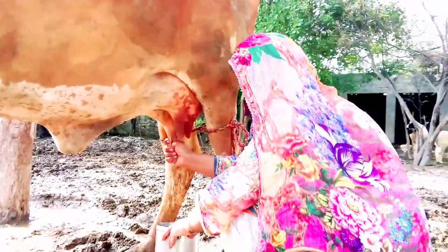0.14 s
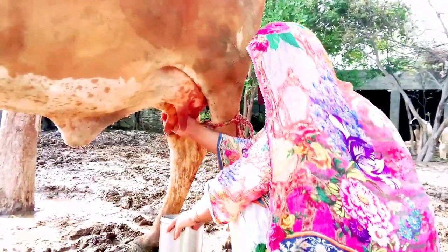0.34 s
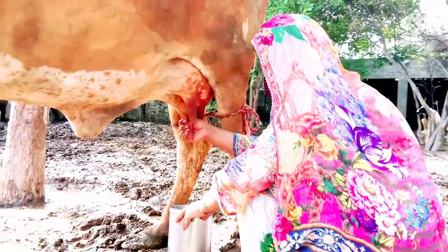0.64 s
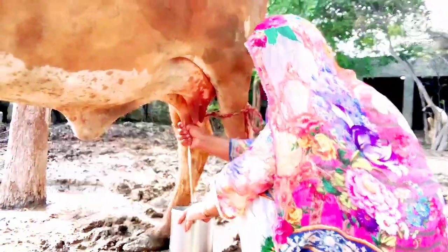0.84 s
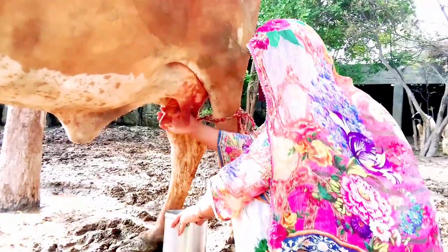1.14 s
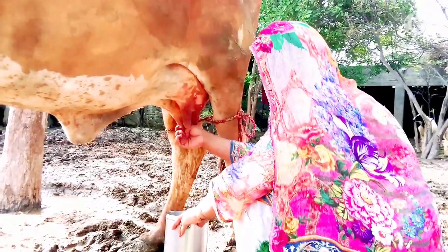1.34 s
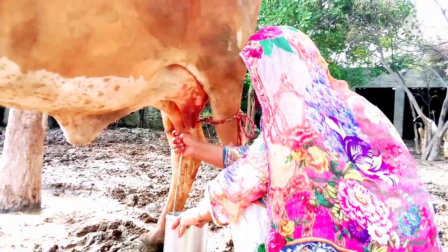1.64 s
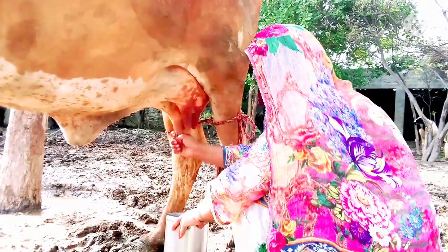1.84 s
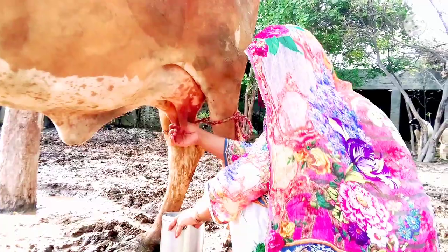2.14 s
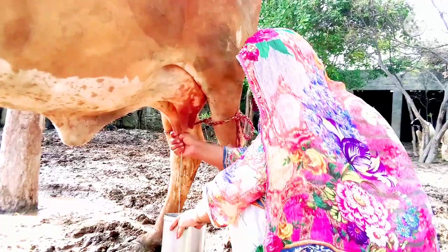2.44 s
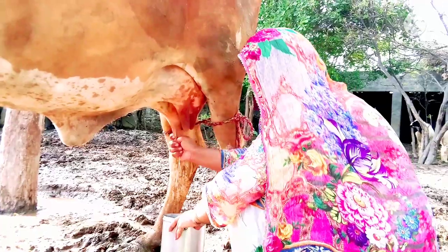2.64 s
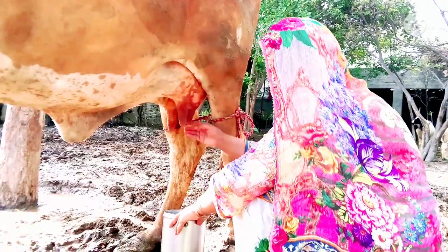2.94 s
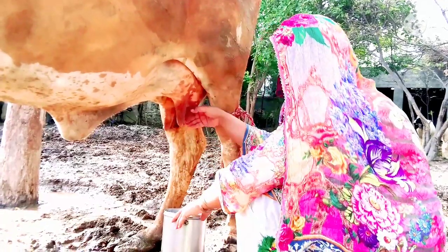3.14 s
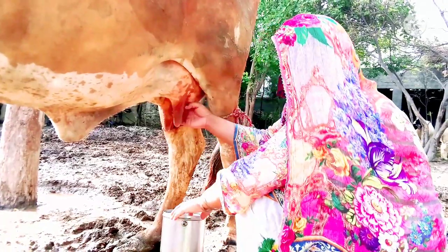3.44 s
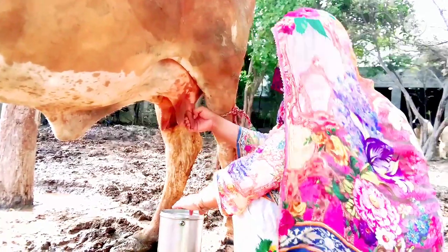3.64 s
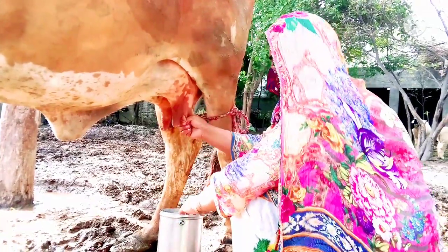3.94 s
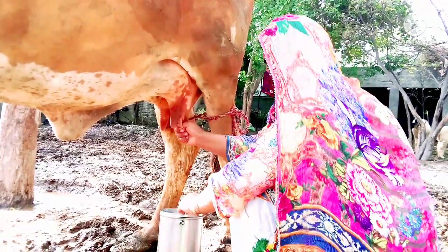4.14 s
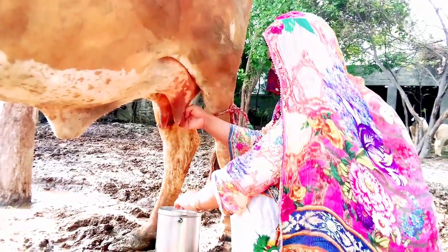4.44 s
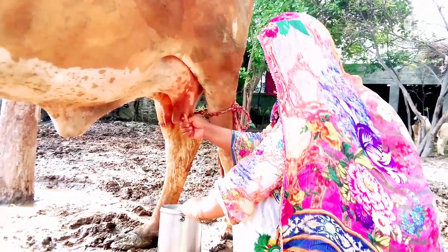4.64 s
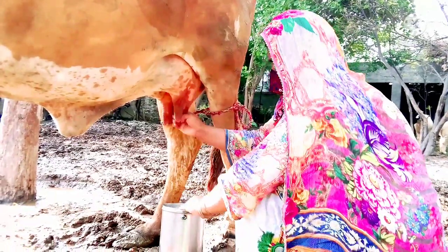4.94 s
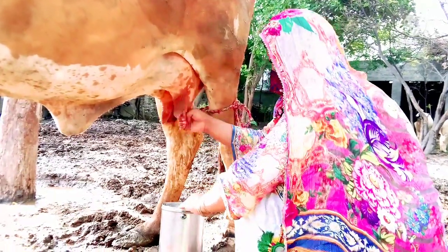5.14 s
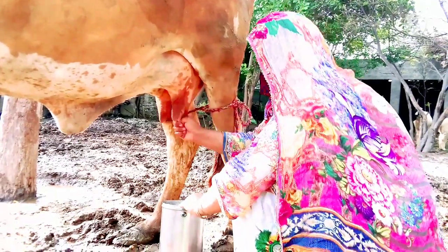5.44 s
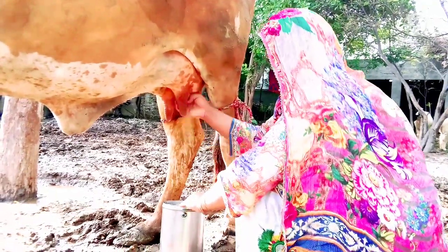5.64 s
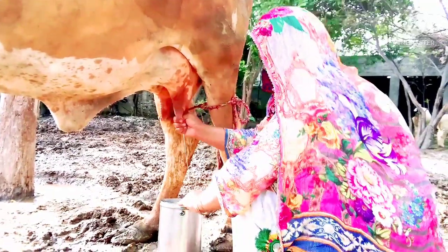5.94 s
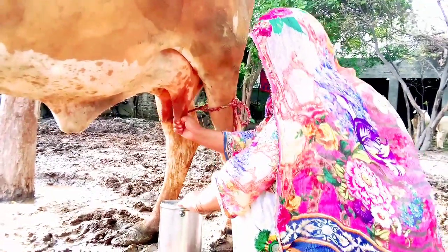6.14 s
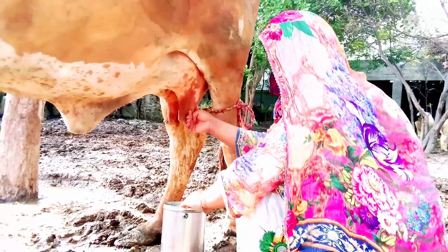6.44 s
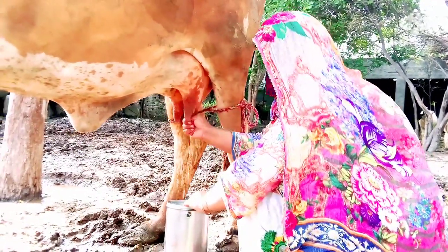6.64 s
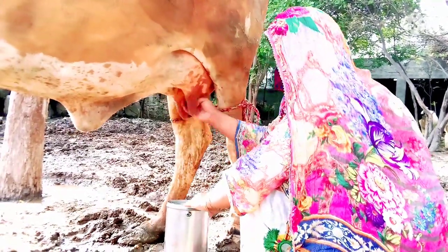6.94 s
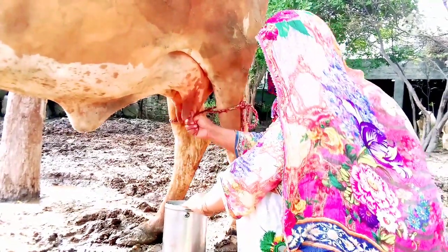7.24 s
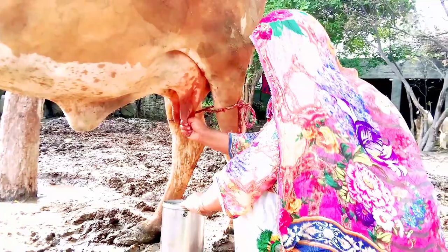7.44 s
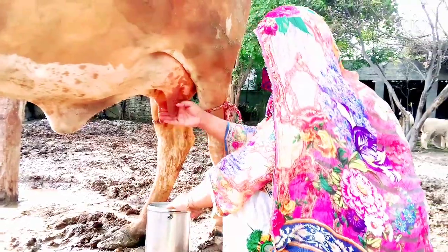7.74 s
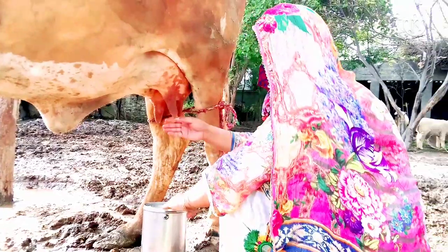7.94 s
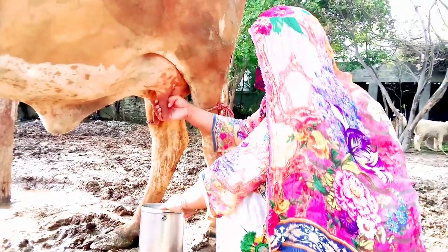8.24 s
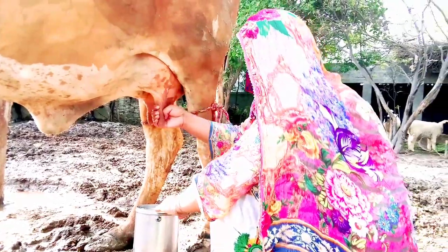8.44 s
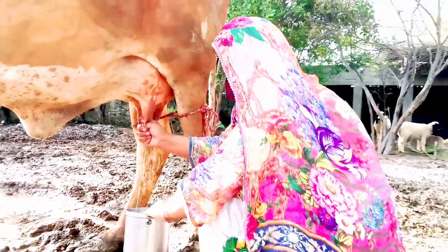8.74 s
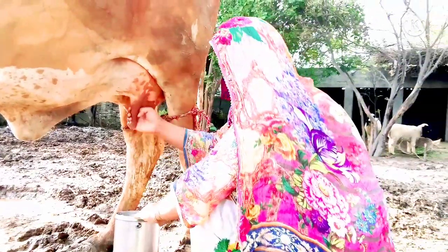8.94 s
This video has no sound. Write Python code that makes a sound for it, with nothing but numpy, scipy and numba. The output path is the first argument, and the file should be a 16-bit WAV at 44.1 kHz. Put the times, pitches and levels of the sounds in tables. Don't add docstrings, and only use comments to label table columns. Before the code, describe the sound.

Close by, four brief jets of milk plunge into froth in a metal pail, under a second apart, each a lumpy gurgling drum with a light metallic splash and fine spray. A bird whistles quick rising notes over the first two. Then the milking stops; soft knocks, straw snaps and cloth scuffs remain with far clucks, before another bird trills. Open farm yard, insect hiss, single phone microphone with slightly warbling noise reduction.

```python
import sys
import numpy as np
from scipy import signal
from scipy.io import wavfile
from scipy.ndimage import uniform_filter1d, map_coordinates
from numba import njit

SR = 44100
rng = np.random.default_rng(int(sys.argv[2]) if len(sys.argv) > 2 else 0)


def volts_from_decibels(level):
    exponent = np.asarray(level, float) / 20
    return 10 ** exponent


def generate_wav(sig):
    pcm = np.round(np.clip(np.atleast_2d(sig).T, -1, 1) * 32767).astype(np.int16)
    wavfile.write(sys.argv[1], SR, pcm)


N = 401310


def rms_one(x):
    return x / np.sqrt(np.mean(x ** 2) + 1e-20)


def levelled(x, window):
    return x / np.sqrt(uniform_filter1d(x ** 2, size=window) + 1e-12)


def in_time(rows):
    s, value = np.transpose(rows)
    return np.interp(np.arange(N) / SR, s, value)


def gate(s, length, rise, fall, sag_db_per_s=0):
    t = np.arange(N) / SR - s
    fade_db = -20 * np.maximum(t - length, 0) / fall
    return np.clip(t / rise, 0, 1) ** 2 * volts_from_decibels(fade_db - sag_db_per_s * np.clip(t, 0, length))


def lifts(rows, column):
    t = np.arange(N) / SR
    return sum(row[column] * np.cos(np.pi * np.clip((t - row[0]) / row[1], -.5, .5)) ** 2 for row in rows)


def add(out, s, sound):
    i = max(round(s * SR), 0)
    out[i:i + len(sound)] += sound[:N - i]


def drift(rate_hz):
    r = np.exp(-80 * np.pi * rate_hz / SR)
    slow = signal.lfilter([1], [1, -2 * r, r * r], rng.standard_normal(N // 40 + 2002))[2000:]
    return np.interp(np.arange(N) / 40, np.arange(len(slow)), rms_one(slow))


def grains(per_s, spread_db):
    sizes = volts_from_decibels(spread_db * np.minimum(rng.exponential(1, N), 4)) * rng.choice([-1, 1], N)
    return rms_one(sizes * (rng.random(N) < per_s / SR) + 1e-18)


def resonance(x, hz, width_hz):
    r = np.exp(-np.pi * width_hz / SR)
    return signal.lfilter([(1 - r * r) / 2, 0, (r * r - 1) / 2], [1, -2 * r * np.cos(2 * np.pi * hz / SR), r * r], x)


@njit
def gliding(x, hz, width_hz, sr):
    out, r = np.zeros(len(x)), np.exp(-np.pi * width_hz / sr)
    for i in range(2, len(x)):
        out[i] = x[i] - x[i - 2] + 2 * r * np.cos(2 * np.pi * hz[i] / sr) * out[i - 1] - r * r * out[i - 2]
    return out


def coloured(x, spectrum, patchy_db, patch_s=.06):
    hz, s, cells = signal.stft(x, SR, nperseg=512)
    place, points = np.log(np.maximum(hz, 10)), np.array(spectrum)
    chance = rng.standard_normal((50, 400))
    rows, steps = np.meshgrid(6 * (place - np.log(10)), s / patch_s, indexing="ij")
    patches = map_coordinates(chance, [rows, steps], order=1, mode="wrap")
    level_db = np.interp(place, np.log(points[:, 0]), points[:, 1])[:, None] + patchy_db * patches
    return rms_one(signal.istft(cells * volts_from_decibels(level_db), SR, nperseg=512)[1][:N])


# start in seconds, level in dB of cavity, wall, spray.
SLUGS = [(0.048, -38, -46, -62), (0.048, -35.5, -41.5, -35.5), (0.064, -61, -53, -52),
         (0.077, -43, -48, -48), (0.083, -37, -50, -46), (0.111, -38.5, -48, -52), (0.124, -37.5, -53, -45),
         (0.135, -46, -51, -45), (0.156, -47, -44.5, -44), (0.169, -41, -54, -48), (0.191, -37.5, -52, -50),
         (0.208, -35.5, -46.5, -44), (0.227, -44, -47, -44.5), (0.244, -52, -53, -48),
         (0.879, -52, -49, -42), (0.896, -47, -38.5, -45), (0.914, -36, -44, -39), (0.925, -48, -41, -51),
         (0.94, -34.5, -55, -54), (0.964, -41, -45, -41.5), (0.986, -34.5, -47, -40),
         (1.009, -39, -45, -43), (1.026, -30, -43, -40), (1.048, -44, -43, -40), (1.06, -40, -44, -41.5),
         (1.647, -45.5, -47, -40), (1.661, -47, -48, -46), (1.677, -37, -46, -44), (1.694, -33.5, -46, -42),
         (1.707, -35, -54, -47), (1.728, -33.5, -43, -47), (1.74, -33.5, -41.5, -43),
         (1.767, -30.5, -46.5, -48), (1.783, -34, -57, -56), (1.801, -31.5, -56, -45),
         (1.814, -41, -51, -55), (1.833, -37, -56, -64), (2.558, -55, -44.5, -46), (2.569, -44, -43, -45),
         (2.577, -40, -46.5, -56), (2.599, -40, -44.5, -44), (2.616, -32, -55, -42),
         (2.626, -38.5, -51, -43), (2.643, -39, -51, -48), (2.652, -44, -44.5, -40),
         (2.67, -40.5, -44, -46), (2.689, -53, -55, -47)]


def slugged(stream, column, rise_s, fall_s, stream_db, slug_db):
    power = np.zeros(N)
    t = np.arange(3000) / SR
    swell = (1 - np.exp(-t / rise_s)) * np.exp(-t / fall_s)
    for row in SLUGS:
        add(power, row[0], (volts_from_decibels(row[column] + slug_db) * swell / swell.max()) ** 2)
    return np.sqrt(power + (volts_from_decibels(stream_db) * stream) ** 2)


# plunge start in seconds, length in seconds, plunge level in dB,
# wall and spray level in dB, froth cavity at first in Hz.
JETS = [
    (0.041, 0.19, -47.5, -56, 870),
    (0.894, 0.18, -46.5, -46, 667),
    (1.639, 0.16, -42, -48, 840),
    (2.569, 0.11, -47, -47.5, 695),
]


def froth_cavity(lumps_db):
    deep_hz, sinks_s = 465, 0.058
    t, hz = np.arange(N) / SR, np.zeros(N)
    stream = np.zeros(N)
    for s, length, db, _, first_hz in JETS:
        now = (t > s - .1) | (hz == 0)
        hz[now] = deep_hz + (first_hz - deep_hz) * np.exp(-np.maximum(t[now] - s, 0) / sinks_s)
        stream += volts_from_decibels(db) * gate(s - .02, length + 0.015, rise=0.046, fall=0.063)
    slugs = grains(450, 2.6) * volts_from_decibels(lumps_db)
    low = gliding(gliding(slugs, hz, 140.0, SR), hz, 250.0, SR)
    overtones = gliding(gliding(slugs, 1.34 * hz, 110.0, SR), 1.524 * hz, 110.0, SR)
    plunge = levelled(rms_one(low) + 0.22 * rms_one(overtones), 500)
    return slugged(stream, 1, rise_s=.003, fall_s=0.0082, stream_db=-4.5, slug_db=-5.5) * plunge


# centre in Hz, width in Hz, level in dB.
PAIL = [(1260, 310, 1), (2465, 410, 10), (3300, 410, 6.5)]


def pail_wall(lumps_db):
    lead_s = 0.023
    stream = sum(volts_from_decibels(db) * gate(s - lead_s, length + lead_s, rise=0.007, fall=0.058)
                 for s, length, _, db, _ in JETS)
    drops = grains(900, 4.0) * volts_from_decibels(.6 * lumps_db + 2.5 * drift(70))
    wall = np.zeros(N)
    for hz, width_hz, db in PAIL:
        ring = resonance(resonance(drops, hz, width_hz), hz, width_hz * 1.3)
        wall += volts_from_decibels(db) * rms_one(ring) * volts_from_decibels(4.2 * drift(23))
    stream = slugged(stream, 2, rise_s=0.0015, fall_s=0.0078, stream_db=-7, slug_db=-1.5)
    return stream * levelled(wall, 500)


# frequency in Hz, level in dB per Hz.
SPRAY = [(2940, -103), (5000, -12), (7100, -2.5), (10500, -10), (13700, -7.5), (15200, -5), (16000, -24)]


def spray(lumps_db):
    lead_s = .05
    stream = sum(volts_from_decibels(db) * gate(s - lead_s, length + lead_s, rise=.05, fall=.04, sag_db_per_s=21)
                 for s, length, _, db, _ in JETS)
    drops = grains(7000, 5.3) * volts_from_decibels(0.26 * lumps_db + 1.2 * drift(19))
    hiss = levelled(coloured(drops, SPRAY, patchy_db=4.0, patch_s=.015), 900)
    return slugged(volts_from_decibels(0.5) * stream, 3, rise_s=.002, fall_s=0.0087, stream_db=-3.5, slug_db=-1.5) * hiss


def jets():
    lumps_db = 1.5 * drift(40)
    return froth_cavity(lumps_db) + pail_wall(lumps_db) + spray(lumps_db)


def whistle(hz, db, edge, rough):
    shake = rng.standard_normal((2, 9000))
    shake = [rms_one(uniform_filter1d(uniform_filter1d(v, size=90), size=90))[:len(hz)] for v in shake]
    phase = 2 * np.pi * np.cumsum(hz * (1 + 0.017 * rough * shake[0])) / SR
    tone = np.sin(phase) * (1 + rough * shake[1])
    return np.sqrt(2) * volts_from_decibels(db) * signal.windows.tukey(len(hz), np.clip(edge, 0, 1)) * tone


# start in seconds, start in Hz, top in Hz, level in dB.
RISES = [(0.215, 3600, 4640, -50), (.347, 3450, 4575, -49.5), (0.489, 3300, 4510, -50),
         (0.62, 3350, 4610, -50), (.783, 3650, 4610, -51), (.945, 4600, 4634, -49),
         (1.073, 3550, 4610, -47.5), (1.221, 3800, 4705, -46)]


def rising_bird():
    out, t = np.zeros(N), np.arange(round(.064 * SR)) / SR
    for s, start_hz, top_hz, db in RISES:
        leap_hz = (start_hz - top_hz) * np.exp(-np.maximum(t - .004, 0) / 0.0062)
        creep_hz = -255 * np.exp(-t / 0.0188)
        loudness = 1 - .45 * np.exp(-(t / .016) ** 2)
        add(out, s, loudness * whistle(top_hz + leap_hz + creep_hz, db, edge=0.063, rough=0.21))
    return out


def sliding_notes(rows):
    out = np.zeros(N)
    for s, length, start_hz, end_hz, db in rows:
        along = np.linspace(0, 1, round(length * SR))
        track = start_hz + (end_hz - start_hz) * (1 - (1 - along) ** 1.9)
        add(out, s, whistle(track, db, edge=0.13, rough=0.48))
    return out


# start in
# seconds, length in seconds, start in Hz, end in Hz, level in dB.
NOTES = [(0.023, 0.081, 5200, 2680, -49.5), (7.35, 0.085, 4900, 4700, -61), (7.444, 0.051, 4640, 4220, -54),
         (7.515, .012, 5900, 5470, -60), (7.649, 0.049, 5570, 4600, -54.5), (7.66, .02, 4330, 3900, -59),
         (7.738, 0.076, 4530, 4300, -53.5), (7.949, 0.028, 4120, 3980, -62),
         (7.965, 0.052, 5740, 4500, -54), (8.07, 0.046, 4440, 4430, -50.5),
         (8.269, 0.033, 5150, 5040, -54.5), (8.30, 0.028, 4760, 4410, -48.5),
         (8.389, 0.047, 4560, 4310, -50.5), (8.727, 0.021, 3480, 3250, -58.5)]
# start in seconds, pitch in Hz, level in dB.
TRILLS = [
    (7.484, 3380, -42.5),
    (7.788, 3424, -41.5),
    (8.104, 3400, -41.5),
    (8.429, 3337, -41),
]


def singing_bird():
    out = sliding_notes(NOTES)
    t = np.arange(round(0.0518 * SR)) / SR
    turn = t * 88.6 % 1
    pulse = np.sin(np.pi * np.minimum(turn / 0.7, 1))
    for s, hz, db in TRILLS:
        out += sliding_notes([(s - .136, 0.0164, 3490, 3320, db - 10)])
        track = hz * (.93 + (0.1333 + 2.5 * t) * (1 - np.minimum(turn / 0.595, 1)))
        add(out, s, whistle(track, db, edge=0.18, rough=0.36) * pulse)
    return out


# start in seconds, length in seconds, start in Hz, end in Hz, level in dB.
CLUCKS = [(2.835, 0.013, 1660, 1770, -55), (3.155, 0.021, 1660, 1570, -58.5),
          (3.16, 0.018, 2190, 2203, -62.5), (3.71, 0.08, 2163, 2170, -68.5), (3.90, 0.028, 1674, 1760, -65),
          (4.85, 0.072, 1976, 2046, -64), (4.92, 0.027, 1670, 1636, -60.5),
          (4.934, 0.11, 1996, 1986, -65.5), (5.06, 0.041, 1947, 1906, -61.5),
          (5.082, 0.17, 1740, 1912, -69), (5.62, 0.0296, 1820, 1560, -61.5),
          (5.955, 0.099, 1630, 1610, -71), (6.373, 0.071, 2370, 2350, -65),
          (6.522, 0.038, 1690, 1580, -64.5), (6.54, 0.163, 2400, 2293, -70),
          (6.876, 0.071, 1266, 1340, -68), (8.00, 0.072, 1832, 1984, -59), (8.40, 0.013, 1790, 1810, -64),
          (8.47, 0.084, 1824, 1775, -69)]


def far_fowl():
    return sliding_notes(CLUCKS)


# delay in seconds, level in dB.
ECHOES = [(0.057, -7), (0.113, -18)]


def birds():
    riser, others = rising_bird(), singing_bird() + far_fowl()
    heard, scattered = riser + others, 0.88 * resonance(riser, 4600, 1100) + others
    wall = rng.standard_normal(3000) * volts_from_decibels(-60 * np.arange(3000) / SR / 0.066)
    smeared = signal.fftconvolve(riser, wall / np.linalg.norm(wall))[:N]
    for lag_s, db in ECHOES:
        add(heard, lag_s, volts_from_decibels(db) * (smeared + 0.65 * riser))
    t = np.arange(SR // 2) / SR
    trees = rng.standard_normal(len(t)) * volts_from_decibels(-60 * t / 0.36) * (t > .003)
    return heard + volts_from_decibels(1) * signal.fftconvolve(scattered, trees / np.linalg.norm(trees))[:N]


# start in seconds, peak in dB, ring in Hz, T60 in seconds.
KNOCKS = [(0.049, -26, 3250, 0.035), (0.898, -34, 3490, 0.023), (1.072, -32, 3420, 0.035),
          (1.638, -31, 3470, 0.017), (2.26, -36.5, 1155, 0.036), (2.345, -42.5, 1500, 0.04),
          (2.559, -42, 2260, .03), (2.643, -36, 2310, .02), (2.89, -44.5, 3280, 0.052),
          (3.294, -45.5, 1214, 0.14), (3.588, -54, 881, 0.12), (4.224, -49, 2000, 0.029),
          (4.378, -41, 973, 0.053), (4.799, -36, 1016, 0.064), (4.799, -29.5, 1210, 0.02),
          (4.829, -40.5, 1105, 0.022), (5.039, -40, 2700, 0.041), (5.423, -38.5, 3400, 0.025),
          (5.475, -32.5, 2620, 0.034), (5.613, -29.5, 4130, 0.016), (5.912, -43, 1700, 0.041),
          (5.912, -47, 3130, .02), (5.924, -45, 2760, 0.02), (5.928, -41, 1330, 0.023),
          (7.034, -43.5, 794, 0.058), (8.848, -45.5, 1280, 0.047), (8.866, -39, 780, 0.024),
          (8.93, -43, 1240, 0.32)]


def knocks():
    out, t = np.zeros(N), np.arange(8000) / SR
    for s, db, hz, t60_s in KNOCKS:
        rough = rms_one(resonance(rng.standard_normal(len(t)), hz, .5 * hz))
        fade = volts_from_decibels(-60 * t / t60_s) * np.minimum(t * hz / 3, 1) ** 2
        ring = fade * (np.sin(2 * np.pi * hz * t) + .5 * rough)
        add(out, s - 2 / hz, volts_from_decibels(db + 0.5) * ring / np.abs(ring).max())
    return out


# start in seconds, peak in dB, centre in Hz.
SNAPS = [(.019, -29, 10500), (.0405, -25, 11000), (.0523, -17, 7850), (0.052, -25, 13000),
         (.0645, -28, 11500), (.404, -25.5, 9100), (.494, -30, 8300), (.8589, -28.5, 7070),
         (1.0754, -29, 9000), (1.632, -30, 7500), (2.8883, -35, 12900), (3.413, -32.5, 12300),
         (3.714, -44, 7000), (4.443, -22.5, 14200), (4.6957, -35, 13300), (4.7646, -31, 13400),
         (4.788, -33, 13000), (4.7998, -24.5, 9530), (4.8114, -31, 13400), (4.8604, -34, 13400),
         (4.8736, -28.5, 13400), (4.89, -29.5, 13200), (5.04, -26.5, 6450), (5.114, -30.5, 7300),
         (5.251, -32, 6690), (5.5353, -27.5, 9900), (5.6127, -23.5, 7300), (5.619, -26, 8000),
         (5.702, -36, 10100), (6.052, -33, 13400), (6.072, -33, 6500), (6.099, -35, 7000),
         (6.111, -35, 7000), (6.2524, -25, 10100), (7.1114, -35, 7400), (7.5018, -26.5, 12500)]


def snaps():
    out, t = np.zeros(N), np.arange(8000) / SR
    bright = signal.butter(3, [5500, 15500], "band", fs=SR, output="sos")
    fade = volts_from_decibels(-60 * t / .006) + .15 * volts_from_decibels(-60 * t / .03)
    for s, db, hz in SNAPS:
        noise = signal.sosfilt(bright, rng.standard_normal(len(t)))
        snap = fade * rms_one(resonance(noise, hz, .7 * hz))
        add(out, s, volts_from_decibels(db - 3.3) * snap / np.abs(snap).max())
    return out


# start in seconds, length in seconds, centre in Hz, level in dB.
SCUFFS = [(0.416, 0.25, 970, -60.5), (0.492, 0.082, 3200, -58), (1.463, .049, 586, -56.5),
          (2.254, .0087, 4420, -49.5), (2.335, 0.12, 400, -59.5), (2.356, 0.014, 3530, -61),
          (2.368, 0.066, 1100, -59.5), (2.51, 0.048, 2400, -60), (2.567, 0.011, 3570, -50),
          (2.773, .053, 1140, -57), (2.4, .014, 2300, -54), (3.36, 0.13, 1480, -64.5),
          (3.837, .11, 1500, -57), (4.06, 0.083, 1100, -64.5), (4.593, 0.034, 1040, -62),
          (4.78, .04, 12000, -55), (4.85, 0.052, 13800, -50), (4.86, 0.18, 2570, -59.5),
          (4.884, .03, 940, -59), (4.973, 0.06, 735, -57), (5.034, .017, 4660, -50),
          (5.373, 0.032, 2370, -52.5), (5.42, .12, 9000, -55), (5.464, 0.054, 560, -54.5),
          (5.685, .03, 10000, -53), (5.904, 0.055, 2040, -57), (6.045, 0.022, 6500, -51.5),
          (6.36, 0.072, 450, -58.5), (6.372, 0.054, 2170, -59), (6.389, .056, 1200, -58),
          (6.621, .17, 543, -56.5), (7.174, 0.084, 1030, -63.5), (7.212, .094, 466, -58.5),
          (7.49, 0.053, 1310, -60), (7.825, 0.04, 460, -58.5), (7.988, 0.14, 944, -57.5),
          (8.043, 0.028, 1340, -55), (8.101, .03, 1290, -55.5), (8.153, 0.16, 606, -65),
          (8.552, 0.22, 775, -57.5), (8.80, 0.056, 6700, -55), (8.858, .14, 810, -53),
          (9.062, 0.035, 504, -54)]


def scuffs():
    out = np.zeros(N)
    for s, length, hz, db in SCUFFS:
        noise = rng.standard_normal(8000)
        band = rms_one(resonance(resonance(noise, hz, 0.3 * hz), hz, .5 * hz))[-round(length * SR):]
        add(out, s, volts_from_decibels(db) * band * signal.windows.tukey(len(band), .5))
    return out


# frequency in Hz, level in dB per Hz.
RUMBLE = [(15, -67), (25, 3), (70, -9), (152, -3), (203, -15), (284, -5), (409, -16), (500, -10.5),
          (650, -27), (1100, -120)]
# centre in Hz, width in Hz, level in dB.
HOLLOW = [(158.5, 9.6, 0.5), (256, 62, -4), (1240, 18, -19.5)]
# time in seconds, share of rest pitch.
GRIP = [(0, 0.95), (8.46, 0.98), (8.51, 0.75), (8.58, 0.9), (8.64, 1.01), (8.75, 1.05), (9.1, 0.96)]
# middle in seconds, length in seconds, rumble lift in dB.
RUBS = [(.17, 0.18, 2), (.48, 0.26, 6), (1.06, 0.098, 5), (1.29, 0.15, 1.5), (2.34, 0.052, 15.5),
        (3.85, 0.038, 11), (4.41, 0.4, 5), (4.84, 0.26, 2.5), (5.47, 0.21, 7.5), (6.03, 0.14, 3.5),
        (6.6, 0.82, 2.5), (7.02, 0.18, 3), (7.33, 0.38, 11.5), (8.03, 0.48, 3.5), (8.31, 0.22, 3.5),
        (8.57, 0.38, 15.5), (8.69, 0.13, 9), (8.8, 0.13, 9.5), (8.95, 0.39, 15.5), (9.1, 0.079, 17.5)]


def rumble():
    level_db = -67.5 + lifts(RUBS, column=2)
    ringing = np.clip((level_db + 61.5) / 6, 0, 1)
    white, grip = rng.standard_normal(N), in_time(GRIP)
    hollow = rms_one(sum(volts_from_decibels(db) * rms_one(gliding(white, hz * grip, float(width_hz), SR))
                         for hz, width_hz, db in HOLLOW))
    low_cut = signal.butter(2, 75, "high", fs=SR, output="sos")
    ground = rms_one(signal.sosfilt(low_cut, coloured(rng.standard_normal(N), RUMBLE, patchy_db=3.0)))
    return volts_from_decibels(level_db) * ((1 - 0.89 * ringing) * ground + 1.17 * ringing * hollow)


# frequency in Hz, level in dB per Hz.
RUSTLE = [(200, -26), (350, -5.5), (800, 1.5), (1500, -3.5), (2600, 0), (3600, -1.5), (4600, -10.5),
          (6500, -12)]
# middle in seconds, length in seconds, rustle and leaves lift in dB.
STIRS = [(.15, 0.57, 13.5, 6.5), (.48, 0.42, 4, 3.5), (1.0, 0.42, 14, 9.5), (1.75, 0.6, 5.5, 5),
         (2.23, 0.17, 1.5, 2.5), (2.34, 0.32, 5, 1.5), (3.9, 0.33, 6.5, 4.5), (4.45, 0.4, 2.5, 2),
         (4.88, 0.26, 4, 2), (5.48, 0.49, 9, 4), (5.78, 0.26, -2, -0.5), (6.04, 0.29, 4.5, 0.5),
         (6.24, 0.18, 4, 6), (6.56, 0.13, 0.5, 0), (7.17, 0.42, 0.5, 2.5), (7.65, 1, 1, 3),
         (8.19, 0.75, 6, 1.5), (8.4, 0.086, 2.5, 1.5), (8.53, 0.17, 5, -3), (8.94, 0.46, 10.5, 2.5)]


def rustle():
    level_db = -66 + lifts(STIRS, column=2)
    return volts_from_decibels(level_db + 2.0) * coloured(grains(3000, 0.87), RUSTLE, patchy_db=4.5, patch_s=.03)


# frequency in Hz, level in dB per Hz.
LEAVES = [(2650, -16), (4500, -10.5), (5300, -8.5), (5590, -4.5), (7460, 6.5), (9020, -1), (11000, 1),
          (14300, -31), (22000, -120)]


def leaves(swell_db):
    level_db = -62 + 0.35 * swell_db + lifts(STIRS, column=3)
    return volts_from_decibels(level_db) * coloured(grains(9000, 3.14), LEAVES, patchy_db=3.0, patch_s=.04)


# frequency in Hz, level in dB per Hz.
INSECTS = [(8500, -35), (10000, -10.5), (11300, -1), (11900, -2), (12250, -7), (12700, -1.5), (13300, 0.5),
           (13900, 3), (15200, -10.5), (15900, -22)]
# start in seconds, length in seconds, level in dB.
BOUTS = [
    (0, 0.14, -2),
    (1.05, 1.95, -11.5),
    (3.9, 1.1, -8),
    (5.847, 0.95, -6),
    (7.55, 1.03, -11.5),
]


def insects(swell_db):
    hiss = coloured(rng.standard_normal(N), INSECTS, patchy_db=1.0, patch_s=0.298) * volts_from_decibels(1.5 * drift(200))
    bouts = sum(volts_from_decibels(db) * gate(s, length, rise=0.17, fall=0.13) for s, length, db in BOUTS)
    single = rms_one(resonance(rng.standard_normal(N), 13230, 220)) * (0.23 + bouts)
    return volts_from_decibels(-57.5 + 0.14 * swell_db) * (hiss + single)


# time in seconds, level in dB.
CHORUS = [(0.0, -54), (0.25, -61), (0.76, -51.5), (1.01, -57), (2.89, -56.5), (3.75, -65.5), (4.56, -59),
          (5.37, -61), (6.36, -63.5), (7.22, -65.5), (8.06, -58.5), (9.1, -62)]


def yard():
    chorus_db = in_time(CHORUS)
    swell_db = chorus_db - chorus_db.mean()
    return rumble() + rustle() + leaves(swell_db) + insects(swell_db)


def scene():
    return np.tile(jets() + birds() + knocks() + snaps() + scuffs() + volts_from_decibels(3.5) * yard(), (2, 1))


def denoise(x, strength, least_db):
    cells = signal.stft(x, SR, nperseg=1024, noverlap=768)[2]
    size = uniform_filter1d(np.abs(cells), size=2, axis=1) + 1e-12
    steady = uniform_filter1d(np.median(size, axis=1), size=9)[:, None]
    gain = np.maximum(1 - strength * steady / size, volts_from_decibels(least_db))
    return signal.istft(cells * gain, SR, nperseg=1024, noverlap=768)[1][:N]


def roll_off(x):
    return signal.sosfilt(signal.butter(12, 16630, fs=SR, output="sos"), x)


def record(dry):
    top_cut = signal.cheby2(16, 40, 15650, fs=SR, output="sos")
    mono = signal.sosfilt(top_cut, denoise(dry[0], strength=0.53, least_db=-7.5))
    mix = np.tile(mono - 1e-4, (2, 1))
    return roll_off(mix)


dry = scene()
out = record(dry)
generate_wav(out)
```